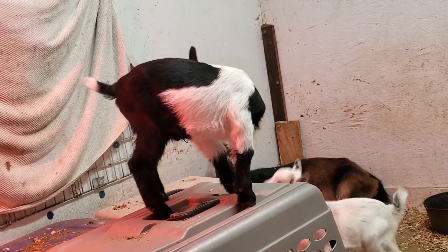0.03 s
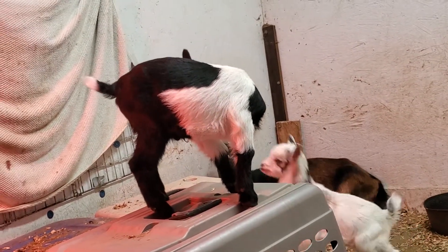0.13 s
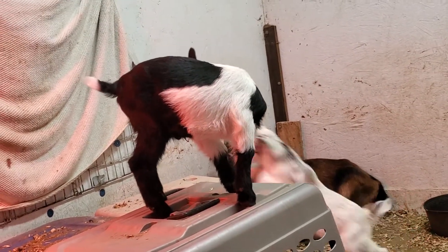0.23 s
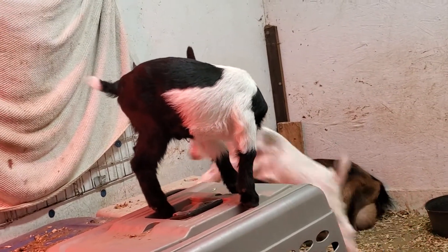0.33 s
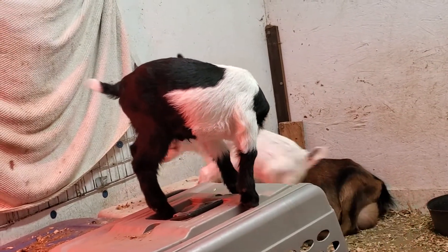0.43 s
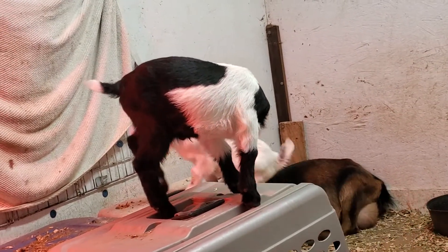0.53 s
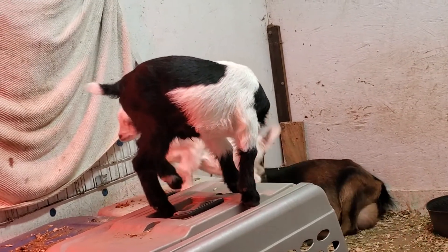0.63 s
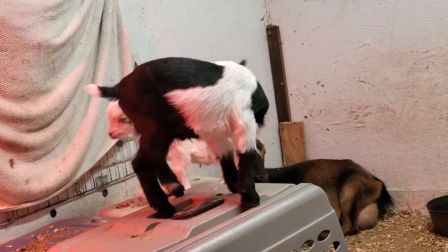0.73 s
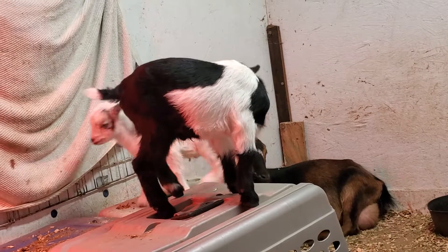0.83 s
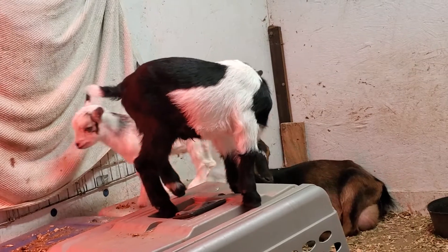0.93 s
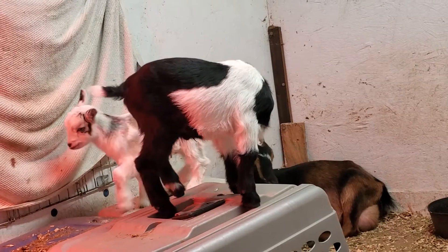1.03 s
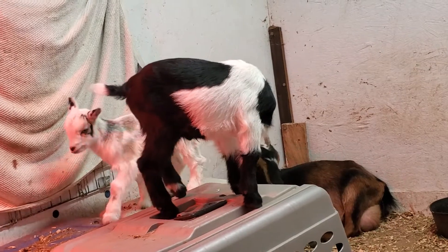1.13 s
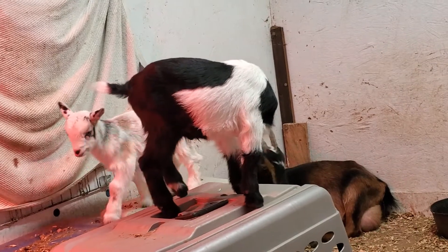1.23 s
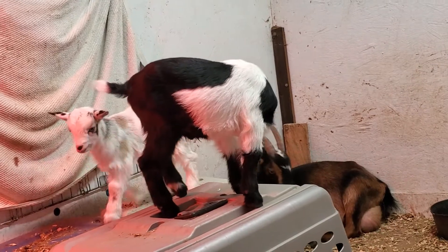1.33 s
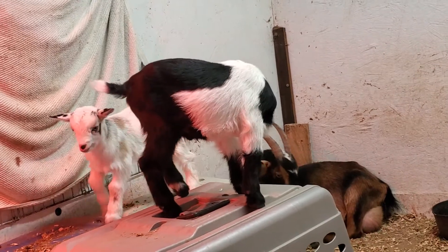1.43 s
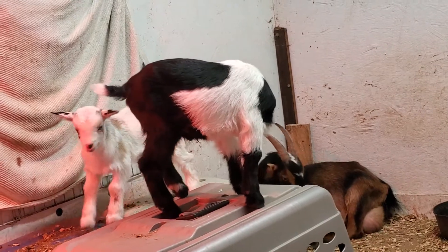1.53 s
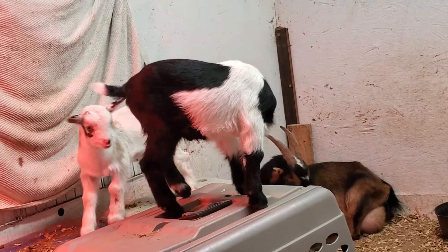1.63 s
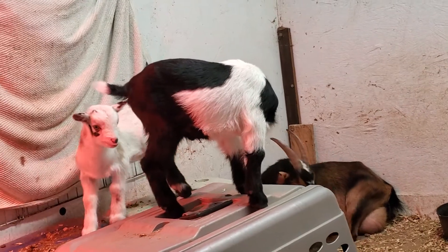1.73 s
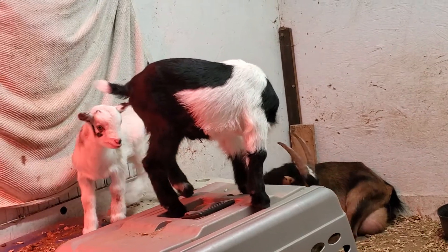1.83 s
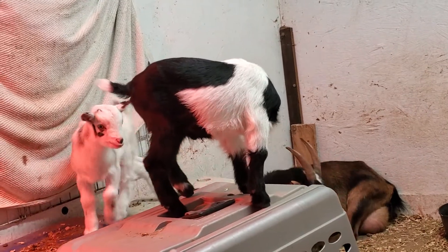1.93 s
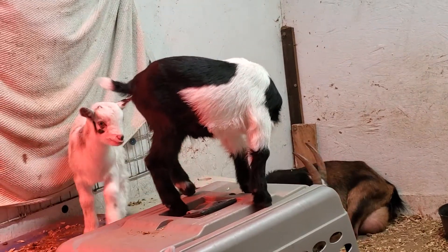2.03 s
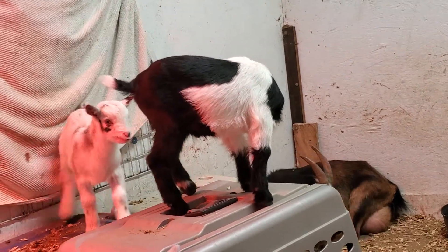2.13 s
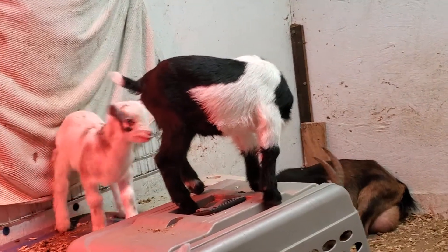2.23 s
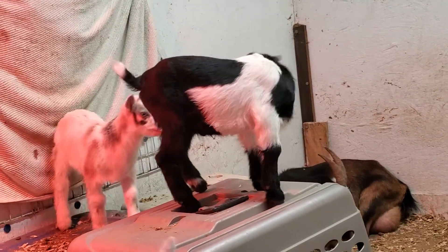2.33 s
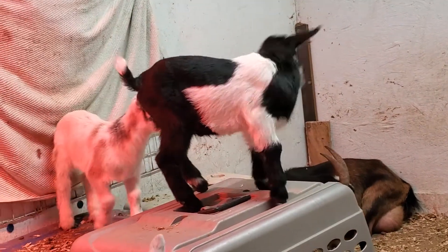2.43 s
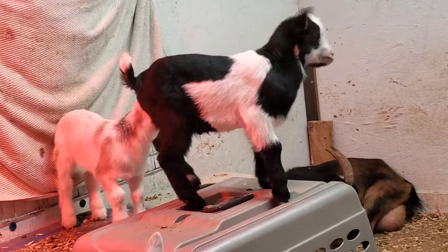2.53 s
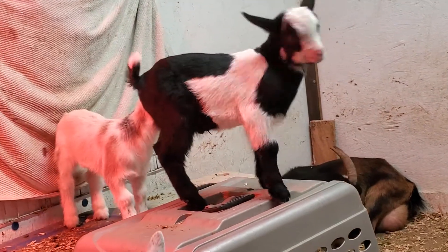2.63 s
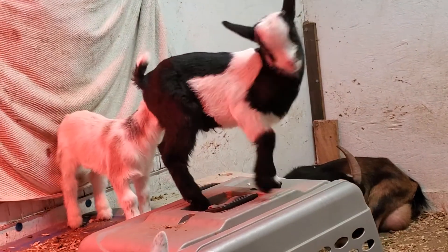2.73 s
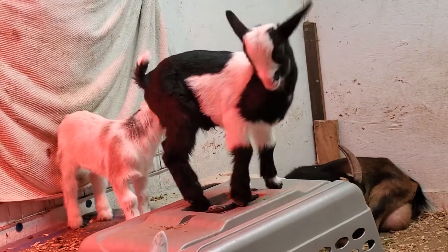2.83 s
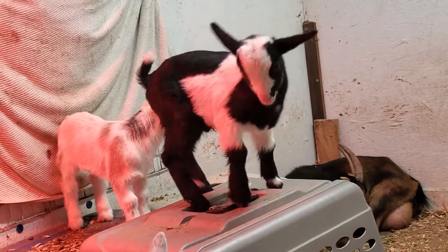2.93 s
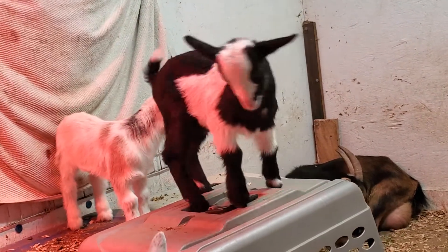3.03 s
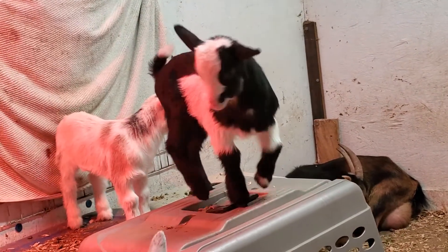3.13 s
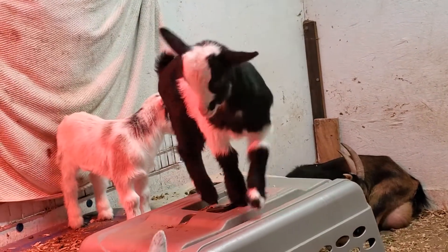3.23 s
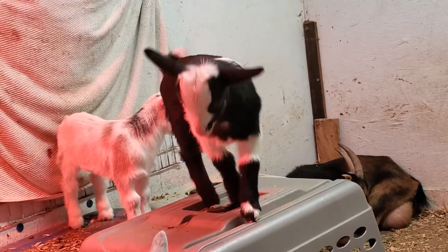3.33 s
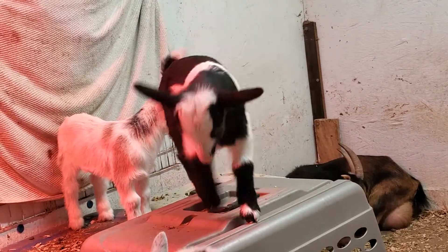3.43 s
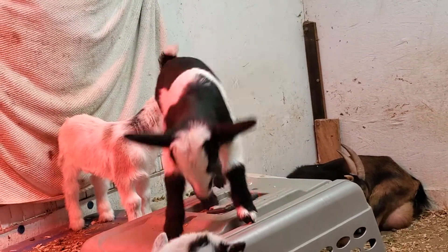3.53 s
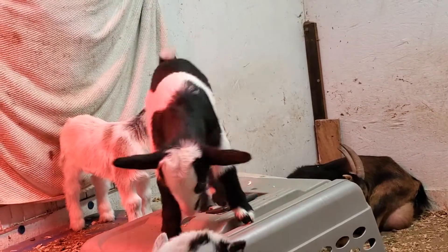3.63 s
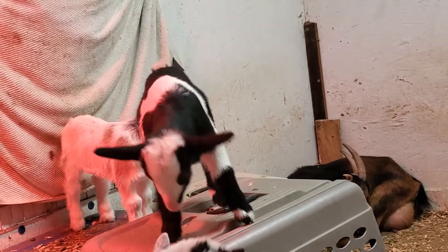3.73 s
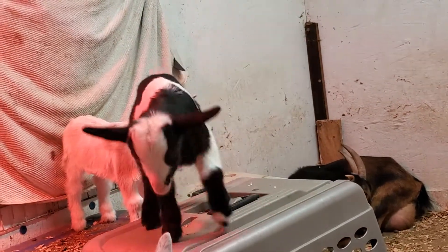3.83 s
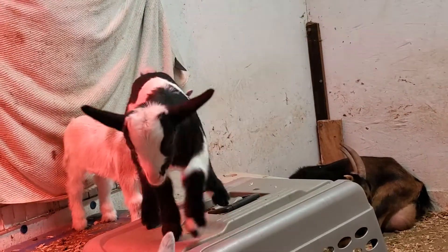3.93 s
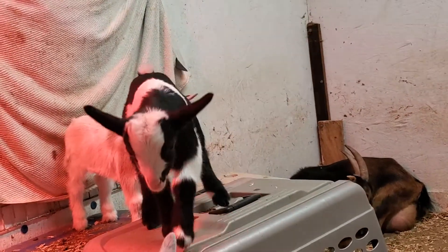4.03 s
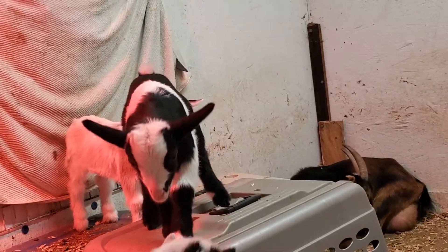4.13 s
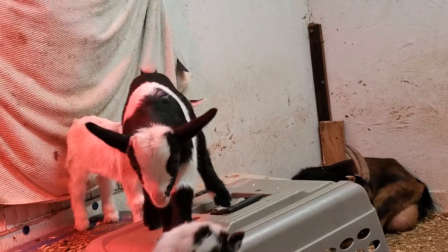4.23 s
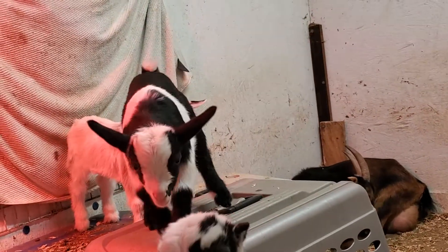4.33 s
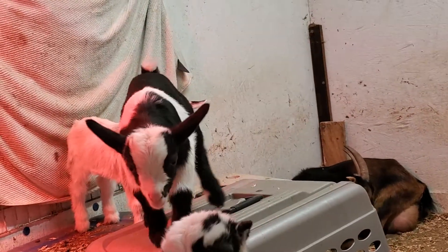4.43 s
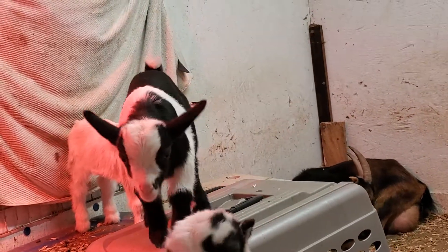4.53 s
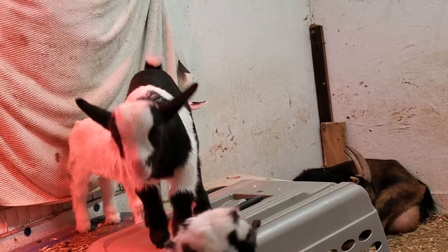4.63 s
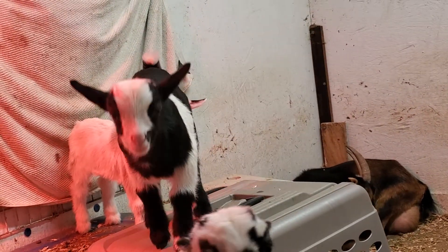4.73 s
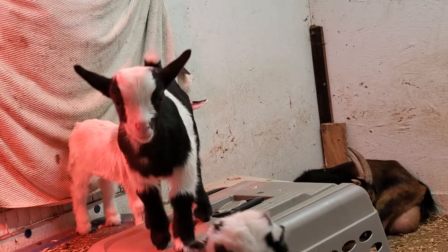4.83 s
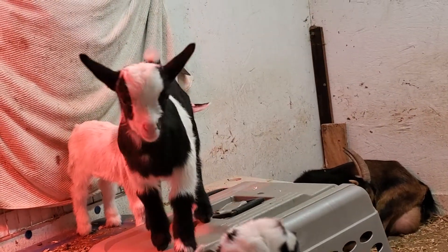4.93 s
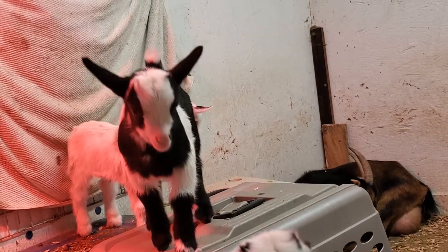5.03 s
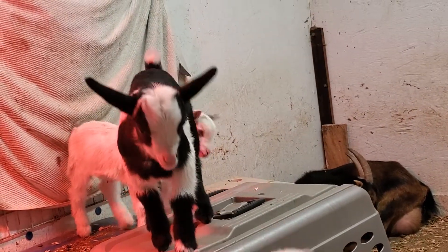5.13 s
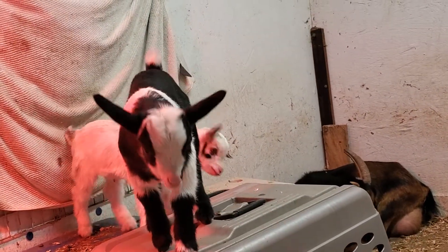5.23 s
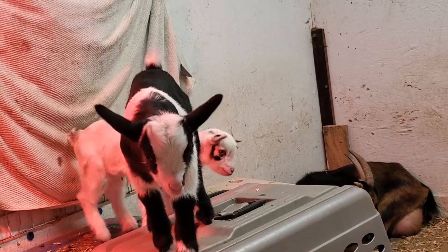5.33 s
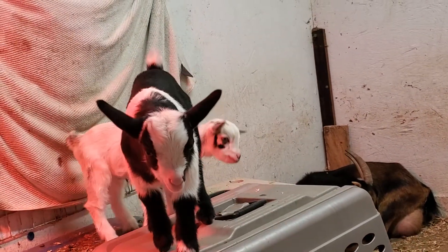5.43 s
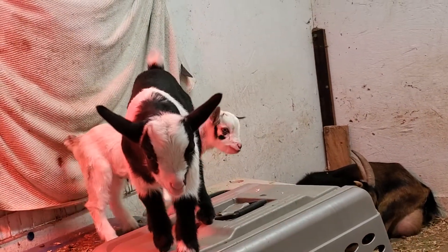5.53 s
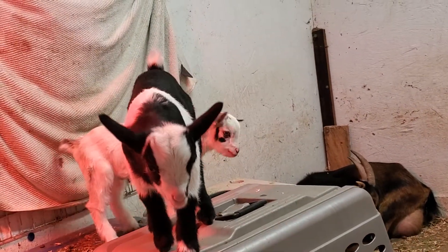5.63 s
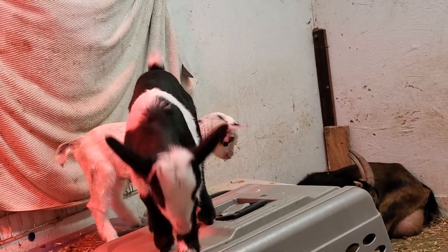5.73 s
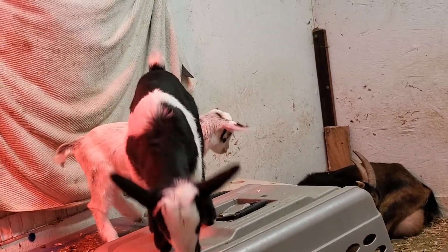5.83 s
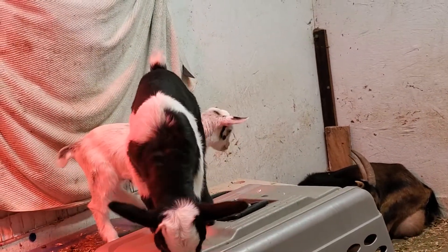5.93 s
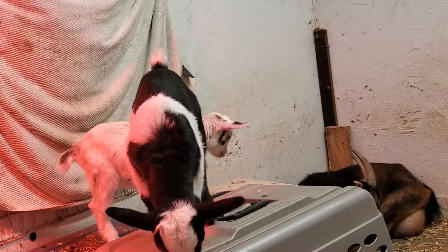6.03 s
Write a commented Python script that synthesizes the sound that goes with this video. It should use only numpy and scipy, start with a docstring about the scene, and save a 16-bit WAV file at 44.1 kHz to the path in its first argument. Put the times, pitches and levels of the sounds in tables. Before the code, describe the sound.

In a small hard-walled pen, heard close in stereo and leaning left, a young goat's hooves work a hollow plastic carrier. After a small tick and rustle at the start, a loud tumble of booms, knocks, clicks and crushed grit hits at 0.3-0.5 s, with another strong blow at 0.8 and lighter taps to 1.15. A lull follows; around 1.6 s fur swishes along cloth, with a low boom near 1.75. Softer uneven knocks and dry rustles run from 1.8 to 2.4, then clattering steps from 2.6 to 3.5. A big resonant thump lands at 3.6, another knock at 3.8. Steps grow sparse: 4.1, 4.4-4.5, a deep double knock at 5.2, dull thuds at 5.4 and 5.7. Tiny scuffs and dull low swells come between. Throughout, a faint blurred whine around 2 kHz repeatedly glides upward far away, over soft low air and a slowly sinking bright hiss.

```python
"""Hollow knocks and booms: a goat kid steps about on an upturned plastic carrier in a small hard-walled pen.
Each hoof sets ringing modes going in the box, top panel and shell; shaped noise adds knock, click and grit.
Bright rustles and short ticks, scuffs, a kid brushing along a hanging blanket and dull low swells are
coloured noise that swells and fades. A faint high whine, a blurred gliding tone, wavers far away over
a faint bright hiss that slowly sinks and the soft noise of the air."""
import sys
import numpy as np
from scipy import signal
from scipy.fft import rfft, irfft, next_fast_len
from scipy.io import wavfile

SR = 44100
rng = np.random.default_rng(int(sys.argv[2]) if len(sys.argv) > 2 else 0)


def output_pcm(signal):
    """Save a mono or channel-first signal as 16-bit PCM at the path in sys.argv[1].

    Samples are clipped to [-1, 1] before scaling.
    """
    pcm = np.clip(np.atleast_2d(signal).T, -1, 1) * 32767
    wavfile.write(sys.argv[1], SR, np.round(pcm).astype(np.int16))


N = 268216
TIME = np.arange(N) / SR

# colour of crushed grit, and of the bright rustles: f/Hz, relative level/dB per Hz
GRIT_COLOUR = [(1500, -33), (3500, -7.5), (5800, -12), (7500, -13.5), (8600, -7), (10500, -5.5),
               (12500, -2.5), (14700, 0), (16000, -1)]
# how alike left and right are: f/Hz, likeness from -1 (opposite) to 1 (same)
LIKENESS_BY_PITCH = [(60, .997), (150, .985), (300, .88), (500, .5), (1000, -.1), (2500, 0), (14000, 0)]
# how far the sound leans left, most of all in the top: f/Hz, left minus right/dB
LEAN_BY_PITCH = [(60, 3.5), (210, 2.5), (500, 4.5), (1200, 4.5), (2700, 7), (7000, 5), (10000, 5),
                 (14000, 11)]

# the weight bears down just after contact: centre and width of the change in ringing
PRESS_S, PRESS_WIDTH_S = 0.045, 0.012
# the nearest wall throws a blow back: centre and width of the extra loudness
SLAP_S, SLAP_WIDTH_S = 0.0105, 0.0023
# fading time constant of the first crack, ring time of the pen (to -60 dB), unevenness of the reflections
CRACK_S, PEN_T60_S, GRAIN_DB = 0.002, 0.37, 0.63
# the edge bites and the grit gives way a moment after the hoof touches the plastic
CRUSH_LAG_S = 0.0035
# knock and clack are boosted near the pitch of the spot
SPOT_DB, SPOT_OCTAVES = 4, 0.53
# the louder the panel rings, the more it rings in the modes near one pitch alone
PANEL_OTHERS_DB, PURITY_DB_PER_DB = -13.5, 0.34
# between the rustles a faint bright hiss slowly sinks: level at the start before the flicker, and fall
FLOOR_DB, SINKING_DB_PER_S = -67.5, 1.57
# upward glide of the whine, and the spread of its random waver points
WHINE_RISE_HZ_PER_S, WHINE_WAVER_HZ = 520, 14
WHINE_SKEW = 0.57   # under 1: each swell comes quickly and fades slowly
CUTOFF_HZ = 15800


def from_db(db):
    """Turn decibels into a gain."""
    return 10 ** (np.asarray(db) / 20)


def at_hz(points, hz):
    """Read a curve between its points, on a log-frequency axis."""
    f, value = np.transpose(points)
    return np.interp(np.log(hz + 1), np.log(f), value)


def panned(x, left_db):
    """Lean a sound left by raising the left side and lowering the right by half each."""
    return x * from_db(np.array([[.5], [-.5]]) * left_db)


def add(out, s, sound):
    """Mix a sound in from a given time."""
    at = max(round(s * SR), 0)
    out[..., at:at + sound.shape[-1]] += sound[..., :N - at]


def swell_and_die(t, rise, t60):
    """Reflections pile up, then fade: a quick rise times a steady fall in dB."""
    return (1 - np.exp(-t / rise)) * from_db(-60 * t / t60)


def wander(rate_hz):
    """Chance variation: straight lines between random points of spread 1, rate_hz points a second."""
    knots = rng.standard_normal(int(N / SR * rate_hz) + 2)
    return np.interp(TIME * rate_hz, np.arange(len(knots)), knots)


def coloured(pair, spectrum):
    """Colour two unrelated signals with a filter that never sounds early, and blend them into left and right."""
    size = 2 * next_fast_len(N // 2 + SR // 8)
    hz = np.arange(size // 2 + 1) * SR / size
    gain = from_db(at_hz(spectrum, hz))
    gain = gain / np.sqrt(np.mean(gain ** 2))   # unit power
    # folding the cepstrum forward in time makes the filter minimum-phase
    cepstrum = irfft(np.log(gain))
    cepstrum[1:size // 2] *= 2
    cepstrum[size // 2 + 1:] = 0
    mid, side = rfft(pair, size) * np.exp(rfft(cepstrum))
    # more mid makes the two ears alike, more side makes them opposite
    alike = np.clip(at_hz(LIKENESS_BY_PITCH, hz), -1, 1)
    mid = mid * np.sqrt((1 + alike) / 2)
    side = side * np.sqrt((1 - alike) / 2)
    left_right = np.array([mid + side, mid - side])
    return irfft(panned(left_right, at_hz(LEAN_BY_PITCH, hz)))[:, :N]


def hiss(spectrum):
    """Make steady stereo noise of a given colour."""
    return coloured(rng.standard_normal((2, N)), spectrum)


def stirring(rows, attack_s, t60):
    """Each sound builds up, lasts a while, then dies away; their powers add up."""
    power = np.zeros(N)
    for s, length, level_db in rows:
        age = np.maximum(TIME - s, 0)
        build_up = 1 - np.exp(-age / attack_s)
        fade_db = -60 * np.maximum(age - length, 0) / t60
        power += (build_up * from_db(level_db + fade_db)) ** 2
    return np.sqrt(power)


def ring(modes, times, levels_db, pitches_hz, reach_octaves, far_db, rise, press_db, scatter_db):
    """Each hoof rings all modes, most strongly those near the pitch of the spot where it lands."""
    hz, mode_db, t60 = np.transpose(modes)
    t = TIME[:SR * 2 // 3]
    pressing = from_db(press_db * np.exp(-((t - PRESS_S) / PRESS_WIDTH_S) ** 2))
    tones = np.exp(2j * np.pi * hz[:, None] * t)
    rings = pressing * swell_and_die(t, rise, t60[:, None]) * tones
    # where the ears are less alike, a mode reaches them further out of phase
    apart = np.arccos(np.clip(at_hz(LIKENESS_BY_PITCH, hz), -1, 1))
    out = np.zeros((2, N))
    for s, level_db, pitch, others_db in np.broadcast(times, levels_db, pitches_hz, far_db):
        near = np.exp(-(np.log2(hz / pitch) / reach_octaves) ** 2)
        chance_db = scatter_db * rng.standard_normal(len(hz))
        share = from_db(mode_db + others_db * (1 - near) + chance_db)
        share = share / np.linalg.norm(share)
        ear_phase = np.outer([0, 1], apart * rng.choice([-1, 1], len(hz)))
        phase = 2 * np.pi * rng.random(len(hz)) + ear_phase
        share = panned(share * np.exp(1j * phase), at_hz(LEAN_BY_PITCH, hz))
        add(out, s, np.sqrt(2) * from_db(level_db) * (share @ rings).real)
    return out


def scatter(times, levels_db, rise, t60, tail_db, crack_db=-np.inf, slap_db=0, patchy_db=0, pitches_hz=None):
    """A blow is noise that may crack first, then swells and fades; patches stand for small resonances."""
    t = TIME[:SR * 2 // 3]
    octave = np.log2(1 + np.arange(len(t) // 2 + 1) * SR / len(t))
    envelope = swell_and_die(t, rise, t60)
    envelope = envelope + from_db(tail_db) * swell_and_die(t, rise, PEN_T60_S)
    envelope = envelope + from_db(crack_db) * np.exp(-t / CRACK_S)
    envelope = envelope * from_db(slap_db * np.exp(-((t - SLAP_S) / SLAP_WIDTH_S) ** 2))
    out = np.zeros((2, N))
    for k, (s, level_db) in enumerate(zip(times, levels_db)):
        # each blow draws its own uneven spectrum, 210 points over 15 octaves
        patches = np.interp(octave, np.linspace(0, 15, 210), rng.standard_normal(210))
        gain = from_db(patchy_db * patches)
        gain = gain / np.sqrt(np.mean(gain ** 2))
        if pitches_hz is not None:   # strongest around the pitch of the spot
            octaves_off = octave - np.log2(pitches_hz[k])
            gain = gain * from_db(SPOT_DB * np.exp(-(octaves_off / SPOT_OCTAVES) ** 2))
        noise = irfft(gain * rfft(rng.standard_normal((2, len(t)))))
        add(out, s, from_db(level_db) * envelope * noise)
    grain = from_db(GRAIN_DB * wander(700))   # single reflections stand out
    return out * grain / np.sqrt(np.mean(grain ** 2))


def hooves():
    """Weight booms the box and rings the panel; horn knocks the shell, clicks with its edge and crushes grit."""
    # hoof falls: t/s, panel pitch at that spot f/Hz, shell pitch there f/Hz, then levels/dB before the mix:
    # box boom, panel, knock, hard clack, edge click, grit
    steps = [(0.323,215,1340,-39,-53,-55,-56.5,-51,-53), (0.381,213,1140,-23.5,-26,-32,-35.5,-28,-28.5),
             (0.403,235,416,-24.5,-17.5,-26,-34,-40,-37.5), (0.516,229,825,-35,-23,-29,-39,-39,-35),
             (0.734,244,533,-44,-34,-34,-45,-75.5,-71), (.808,221,440,-30,-16,-28.5,-37,-32.5,-27),
             (0.906,206,567,-54.5,-32.5,-36,-58,-58,-65), (0.936,246,590,-47.5,-32.5,-42,-49,-51,-56),
             (1.071,184,400,-37.5,-42,-76,-89,-75,-58), (1.123,262,367,-39,-32,-42,-52,-56,-54),
             (1.1468,246,1430,-37.5,-32,-34.5,-39,-31.5,-28.5), (1.803,298,600,-69,-36,-32.5,-45.5,-52,-50),
             (1.951,213,650,-35,-36,-45,-46.5,-41.5,-55), (2.128,125,384,-53,-41.5,-45,-61,-54,-57),
             (2.215,106,1000,-45,-39,-50.5,-69,-55,-49), (2.282,107,450,-61,-56.5,-51,-58,-67,-55),
             (2.370,126,450,-36,-37,-34.5,-42,-48,-58), (2.627,208.4,860,-40,-31,-29.5,-37,-46,-50),
             (2.825,208.5,900,-43.5,-36.5,-32,-41.5,-42,-51), (2.867,233,775,-44,-48,-39.5,-39,-41.5,-48.5),
             (2.956,201,820,-41,-29.5,-33.5,-40.5,-37.5,-53),
             (3.065,168,1040,-43,-47,-37.5,-46.5,-45.5,-62), (3.276,172,1460,-47.5,-40,-31,-38,-64,-60),
             (3.296,254,1250,-43.5,-36.5,-26.5,-35.5,-64,-55.5),
             (3.517,230,423,-31,-39,-25.5,-33.5,-48,-52), (3.526,225,2230,-48,-35,-42,-34.5,-63,-68),
             (3.627,168.4,674,-23.5,-18.5,-27,-38,-38.5,-42.5),
             (3.777,240,390,-37.5,-29.5,-34.5,-39.5,-40.5,-36.5),
             (4.087,290,562,-49.5,-47.5,-42.5,-51.5,-56,-80),
             (4.42,251,590,-41,-44.5,-36.5,-37.5,-46.5,-77), (4.511,243.4,1030,-36,-36,-32.5,-45.5,-43,-53),
             (5.168,242,397,-30,-31.5,-36.5,-63,-66,-55), (5.192,105,700,-32,-24,-30,-37.5,-43.5,-61),
             (5.443,102.2,435,-36.5,-42,-50,-64,-61,-60.5), (5.669,79.5,428,-37.5,-58.5,-42.5,-54,-71,-67)]
    # weight settles on a planted hoof and flexes the box, with no knock:
    # t/s, panel pitch at that spot f/Hz, box boom level/dB and panel level/dB before the mix
    shifts = [(0,227,-32,-45.5), (1.216,238,-46.5,-36), (1.739,102.7,-25,-30.5), (2.996,163,-35,-29),
              (3.661,169,-41.5,-23), (3.815,230,-49,-40), (4.339,110,-49.5,-62.5), (4.864,132.9,-54,-56.5)]
    # ringing modes of the box and its air, top panel, ribbed shell, and stiff ribs under a hard clack:
    # f/Hz, relative level/dB, ring time to -60 dB t60/s
    box_modes = [(47.3, -3, 0.23), (56.4, -5, 0.52), (65.9, -3, 0.45), (82.3, 3, 0.26)]
    panel_modes = [(106.9, -1, 0.27), (124.3, -6.5, 0.2), (148.7, -3, 0.36), (161.9, 3, 0.25),
                   (187.6, -3.5, 0.46), (200.6, -8, 0.44), (228.96, 1, 0.26), (256.6, -4, 0.23),
                   (274.6, 0, 0.33), (301, -6, 0.42), (316, -6, 0.19)]
    shell_modes = [(384, -1.5, 0.34), (410.4, 10.5, 0.27), (462, 0.5, 0.37), (522.5, 5, 0.31),
                   (598.7, 6.5, 0.24), (698, -2, 0.32), (772, 0, 0.23), (857, -6, 0.38), (939, -12, 0.16),
                   (1143, -3, 0.087), (1380, 11.5, 0.059)]
    rib_modes = [(1240, -2, 0.12), (1467, 3, 0.24), (1667, -2, 0.22), (1954, -6, 0.15), (2480, -9.5, 0.15),
                 (2760, -7, 0.18)]
    # colours of the pen's answer to the boom, the dull knock, the hard clack, and horn edge on hard plastic:
    # f/Hz, relative level/dB per Hz
    thud_colour = [(22, -15.5), (38, -5.5), (52, 2), (100, -8.5), (150, -14.5), (260, -12), (600, -53.5)]
    knock_colour = [(170, -32.5), (300, -0.5), (410, 6), (480, -0.5), (530, 1.5), (620, -0.5), (830, 0),
                    (1050, -4), (1400, -11), (1900, -22), (3500, -48)]
    clack_colour = [(700, -10.5), (1200, 1), (1650, 2.5), (2100, -0.5), (2600, -4.5), (3200, -6.5),
                    (3900, -10), (5000, -25), (6500, -28.5), (10000, -54.5)]
    click_colour = [(1900, -6), (3100, 3.5), (4300, -5.5), (5800, -7), (7500, -13), (11000, -10.5)]

    s, panel_hz, shell_hz, boom_db, panel_db, knock_db, clack_db, click_db, grit_db = np.transpose(steps)
    # steps and shifts of weight load the box alike
    step_loads = [s, panel_hz, boom_db, panel_db]
    load_s, panel_hz, boom_db, panel_db = np.hstack([step_loads, np.transpose(shifts)])
    others_db = PANEL_OTHERS_DB - PURITY_DB_PER_DB * (panel_db - panel_db.mean())

    box = ring(box_modes, load_s, boom_db, panel_hz, reach_octaves=0.59, far_db=-14.0,
               rise=0.013, press_db=5.5, scatter_db=5.0)
    panel = ring(panel_modes, load_s, panel_db, panel_hz, reach_octaves=0.15, far_db=others_db,
                 rise=0.0028, press_db=4.5, scatter_db=2.5)
    shell = ring(shell_modes, s, knock_db, shell_hz, reach_octaves=0.27, far_db=-20.5,
                 rise=0.0087, press_db=-2.0, scatter_db=5.0)
    ribs = ring(rib_modes, s, clack_db, shell_hz, reach_octaves=0.4, far_db=-18.0,
                rise=0.011, press_db=-1.5, scatter_db=2.5)

    thud = scatter(load_s, boom_db, rise=0.021, t60=0.37, tail_db=-15.5)
    knock = scatter(s, knock_db, rise=0.0083, t60=0.37, tail_db=-18.5, crack_db=-4, slap_db=3.5,
                    patchy_db=2.4, pitches_hz=shell_hz)
    clack = scatter(s, clack_db, rise=0.011, t60=0.35, tail_db=-32, crack_db=-2, slap_db=3.0,
                    patchy_db=2.4, pitches_hz=shell_hz)
    click = scatter(s + CRUSH_LAG_S, click_db, rise=0.011, t60=0.34, tail_db=-29, crack_db=-4.5,
                    slap_db=2.0, patchy_db=3.0)
    grit = scatter(s + CRUSH_LAG_S, grit_db, rise=0.0081, t60=0.21, tail_db=-33.5, crack_db=-7,
                   slap_db=4.0, patchy_db=4.1)

    mix = from_db(-4.0) * box + from_db(-0.75) * panel
    mix += from_db(-5.5) * shell + from_db(-13.0) * ribs
    mix += from_db(-5.0) * coloured(thud, thud_colour)
    mix += from_db(-5.5) * coloured(knock, knock_colour)
    mix += from_db(-3.5) * coloured(clack, clack_colour)
    mix += from_db(-8.0) * coloured(click, click_colour)
    mix += from_db(-2.5) * coloured(grit, GRIT_COLOUR)
    return mix


def scuffs():
    """A hoof slides a little on the plastic: a short rasp of noise, roughened by fast chance changes."""
    # slides: t/s, length/s, level/dB before the roughening
    slides = [(.925, 0.018, -54.5), (2.868, 0.01, -48.5), (3.13, 0.03, -65), (3.475, 0.047, -64.5),
              (3.71, 0.081, -59.5), (4.665, 0.014, -72.5), (5.05, 0.036, -77.5), (6.015, 0.04, -76)]
    # colour: f/Hz, relative level/dB per Hz
    scuff_colour = [(1500, -26), (2600, -2), (3600, 3.5), (4700, -5.5), (5600, -6), (7200, -13.5),
                    (12000, -13.5)]
    loudness = stirring(slides, attack_s=0.0021, t60=0.25)
    return loudness * from_db(2.2 * wander(320)) * hiss(scuff_colour)


def bright_rustles():
    """Rustles and short ticks of bright noise flicker fast, over a faint bright hiss that slowly sinks."""
    # bright rustles and short ticks: t/s, length/s, level/dB before the flicker
    rustles = [(0, 0.0028, -44), (.452, 0.006, -42), (.53, 0.023, -52), (.745, 0.076, -62),
               (1.27, 0.058, -65), (1.52, 0.12, -63), (1.595, 0.14, -53.5), (1.79, 0.09, -56),
               (2.04, 0.12, -56.5), (2.205, 0.056, -55.5), (2.32, 0.066, -57), (2.56, 0.077, -63),
               (2.665, 0.042, -54.5), (3.07, 0.051, -60), (3.695, 0.015, -53.5), (4.138, 0.01, -63),
               (4.662, 0.0098, -69), (5.69, .06, -73.5)]
    bright_floor = from_db(FLOOR_DB - SINKING_DB_PER_S * TIME + 1.2 * wander(7.5))
    loudness = np.hypot(bright_floor, stirring(rustles, attack_s=0.01, t60=0.17))
    flicker = from_db(1.2 * wander(230) + 1.2 * wander(40))
    return loudness * flicker * hiss(GRIT_COLOUR)


def blanket():
    """Fur sliding along cloth makes a softer, fuller swish of noise."""
    # brushes along the blanket: t/s, length/s, level/dB before a 5 dB lift
    brushes = [(0, 0.0047, -41.5), (1.48, 0.096, -73.5), (1.57, 0.25, -54.5), (2.05, 0.21, -67.5)]
    # colour of fur on cloth: f/Hz, relative level/dB per Hz
    brush_colour = [(60, 6), (200, 5.5), (350, 6.5), (600, -2), (900, -6), (1500, -8), (2600, -5.5),
                    (3800, -8.5), (5000, -15.5), (7500, -18), (16000, -19.5)]
    loudness = stirring(brushes, attack_s=0.065, t60=0.26)
    return loudness * from_db(5.0 + 2.0 * wander(130)) * hiss(brush_colour)


def dull_swells():
    """Dull low noise swells softly in the background, uneven in loudness."""
    # swells: t/s, length/s, level/dB before the unevenness
    low_swells = [(.1, 0.6, -60), (3.17, 0.29, -56), (3.42, 0.026, -47), (4.33, 0.18, -56),
                  (4.96, 0.24, -69.5), (5.5, 0.29, -63.5)]
    # colour: f/Hz, relative level/dB per Hz
    dull_colour = [(100, 5), (400, -2), (1400, -8.5), (3500, -26.5), (7000, -38)]
    loudness = stirring(low_swells, attack_s=0.03, t60=0.3)
    return loudness * from_db(2.0 * wander(45)) * hiss(dull_colour)


def whine():
    """A rising tone swells and fades, blurred by the walls into a narrow band of its own at each ear."""
    # short swells, each gliding upward: t/s, length/s, starting pitch f/Hz, level/dB before the mix
    swells = [(0, 0.31, 2060, -68), (.6, .15, 2340, -71), (0.805, 0.28, 2100, -58.5),
              (1.31, 0.24, 2010, -69), (1.951, 0.43, 2030, -62), (2.42, 0.47, 1986, -69),
              (2.998, 0.46, 2012, -61), (4.189, 0.3, 2070, -65.5), (4.94, 0.3, 1960, -67.5),
              (5.391, 0.49, 2050, -62.5), (5.895, 0.46, 2010, -72)]
    # colour of the steady haze around the tone: f/Hz, relative level/dB per Hz
    halo_colour = [(1400, -33), (1850, -3), (2000, 4), (2200, 4), (2380, -4.5), (2700, -38.5)]
    latest = np.searchsorted([row[0] for row in swells[1:]], TIME)
    s, length, start_hz, level_db = np.array(swells)[latest].T
    age = np.clip(TIME - s, 0, length)
    hz = start_hz + WHINE_RISE_HZ_PER_S * age + WHINE_WAVER_HZ * wander(17)
    swell = np.sin(np.pi * (age / length) ** WHINE_SKEW)
    # slow noise, below 92 Hz, smears the pure tone into a band
    low_pass = signal.butter(2, 92, fs=SR, output="sos")
    blur = signal.sosfilt(low_pass, rng.standard_normal((2, 2, N)))
    phase = 2 * np.pi * np.cumsum(hz) / SR
    tone = (blur[0] * np.cos(phase) + blur[1] * np.sin(phase)) / blur.std()
    swelling_tone = swell * from_db(level_db - 2.5 + 1.6 * wander(35)) * tone
    halo = from_db(-77.5) * hiss(halo_colour)
    return panned(swelling_tone + halo, left_db=7.0)


def air():
    """The softly stirring air of the pen is mostly low noise that slowly drifts in level."""
    # colour: f/Hz, relative level/dB per Hz
    air_colour = [(20, -36), (55, 12.5), (110, 7), (220, 6), (400, -2.5), (700, -5.5), (1500, -3.5),
                  (3500, -12), (6000, -32.5), (16000, -43.5)]
    return from_db(-69.5 + 0.87 * wander(2.1)) * hiss(air_colour)


def scene():
    """Add up the hooves, scuffs, bright rustles, blanket, dull swells, whine and air."""
    return hooves() + scuffs() + bright_rustles() + blanket() + dull_swells() + whine() + air()


def record(dry):
    """Cut the top steeply with a low-pass filter."""
    return signal.sosfilt(signal.ellip(12, .1, 90, CUTOFF_HZ, fs=SR, output="sos"), dry)


dry = scene()
out = record(dry)
output_pcm(out)
```